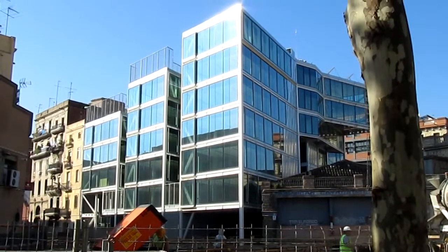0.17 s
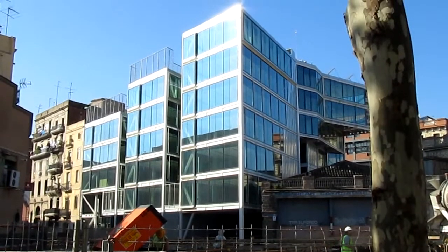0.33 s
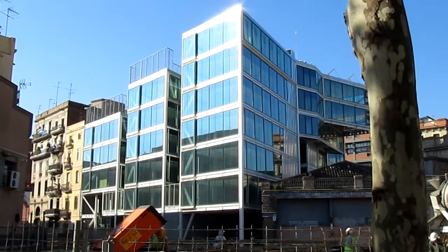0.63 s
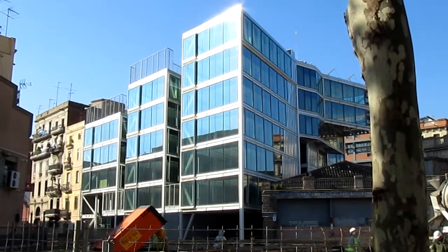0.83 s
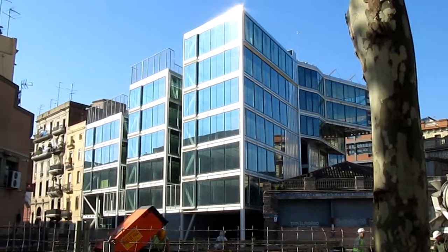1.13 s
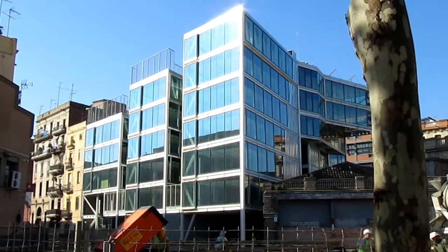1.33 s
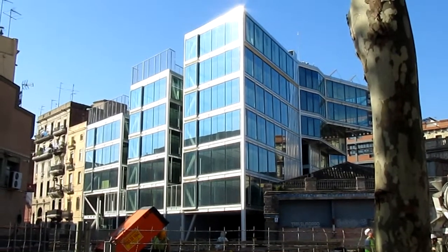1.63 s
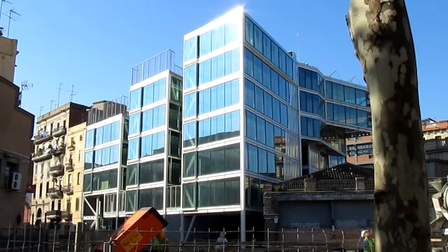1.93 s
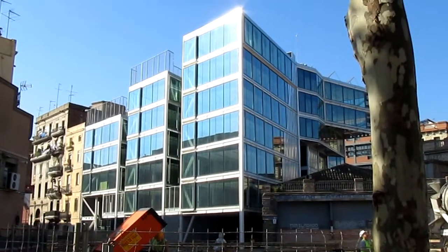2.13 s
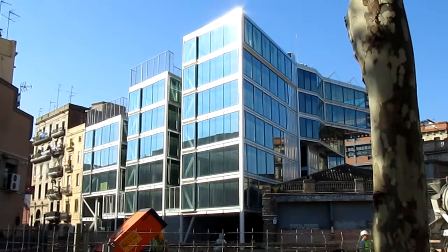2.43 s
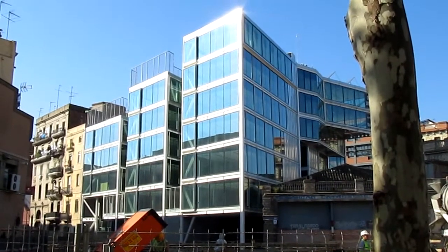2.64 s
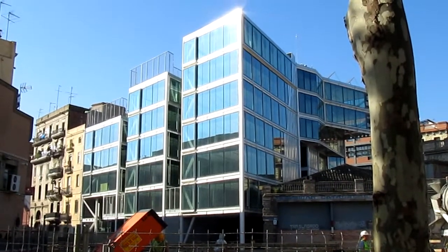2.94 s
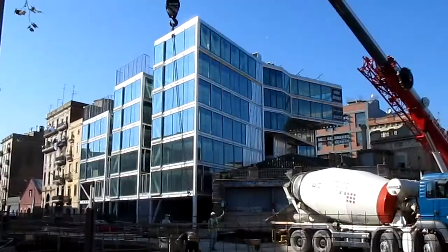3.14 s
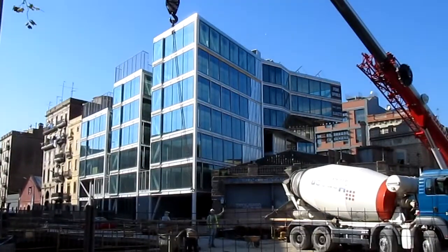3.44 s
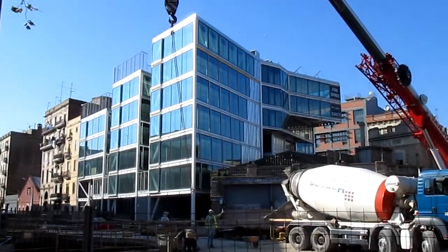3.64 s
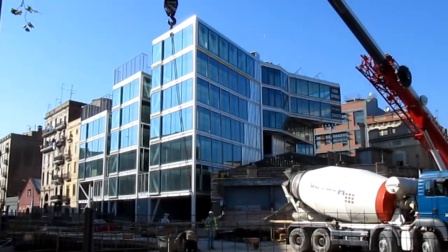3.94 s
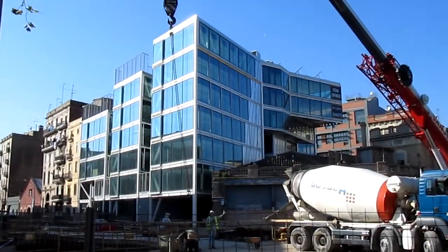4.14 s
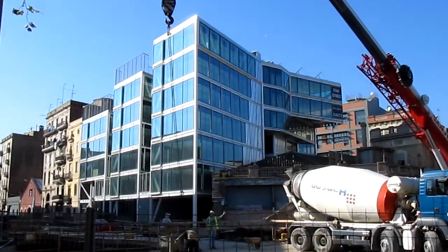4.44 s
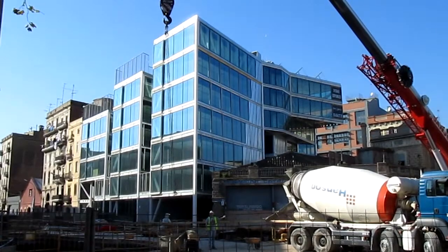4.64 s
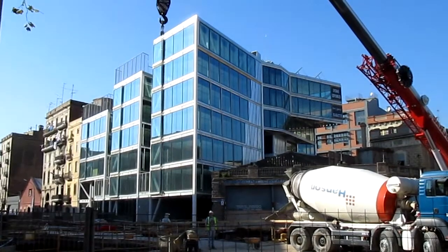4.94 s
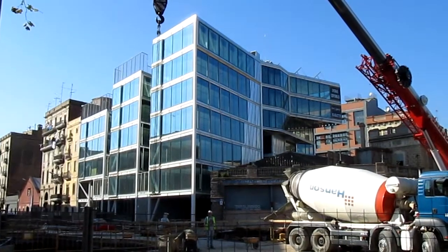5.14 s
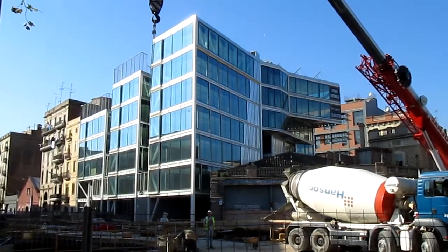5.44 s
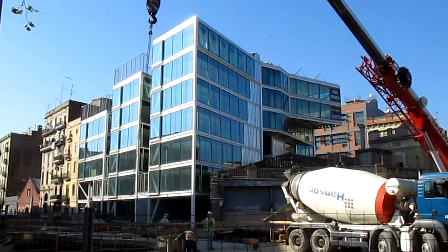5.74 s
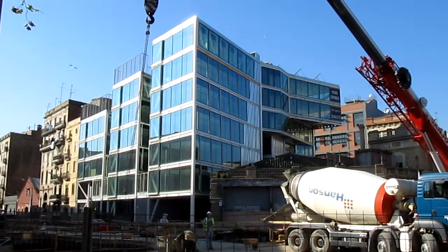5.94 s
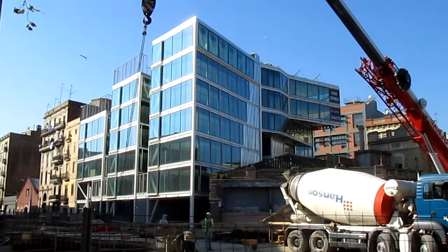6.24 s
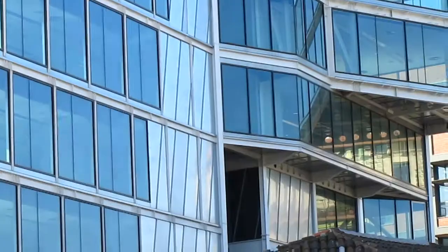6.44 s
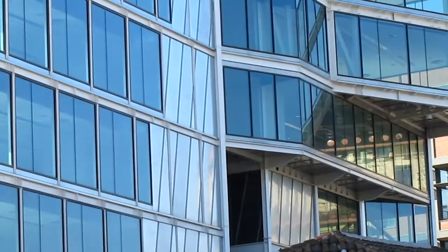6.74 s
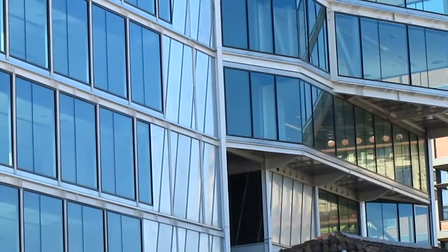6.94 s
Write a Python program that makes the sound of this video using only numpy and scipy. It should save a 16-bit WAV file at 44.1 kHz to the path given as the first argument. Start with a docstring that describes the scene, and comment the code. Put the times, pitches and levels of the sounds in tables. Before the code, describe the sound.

Low engine rumble and a wavering mixer truck drone lie under six irregular, heavy steel hammer blows, the first bright and loud, the third weaker. Each rings for about half a second and washes off surrounding buildings. The recorder's automatic gain dips at loud hits. Two very brief silences split the stereo recording into three parts; the last has no blows, just strong engine drone, a steady high squeal and tiny metallic clinks.

```python
"""Six heavy hammer blows on steel formwork: a crack, a bang and ringing panel modes, with facade echoes and wash.
Diesel machinery rumbles nearby and a mixer truck drones: banded noise plus wavering sine tones.
Metal clinks are short noise bursts; thin squeals are sines, one nearly steady and others gliding.
The recorder's gain ducks at each loud blow and creeps back. The sound cuts out twice, briefly;
after the second break the engines are much louder, with a thin squeal and small clinks."""
import sys
import numpy as np
from scipy import signal
from scipy.io import wavfile
from scipy.ndimage import uniform_filter1d

SR = 44100
rng = np.random.default_rng(int(sys.argv[2]) if len(sys.argv) > 2 else 0)


def master_out(mix):
    """Clip the mix to full scale and print it as 16-bit PCM to the path in sys.argv[1]."""
    frames = np.transpose(np.atleast_2d(mix))
    ceiling = np.clip(frames, -1, 1)
    pcm = np.round(ceiling * 32767).astype(np.int16)
    wavfile.write(sys.argv[1], SR, pcm)


N = 312669
TIME = np.arange(N) / SR
AGE = np.arange(2 * SR) / SR

# hammer blows: (time [s], panel [index], relative level [dB], bass [dB], treble [dB], first impact [dB],
# build-up [s], ring t60 [s], facade wash [dB], facade echo delay [s], facade echo level [dB])
BLOWS = [(0.5985, 0, 2, -5, 5.5, -3.5, 0.009, 0.43, -12.5, 0.34, -26),
         (2.3872, 0, -7, 5, -4, -9, 0.0041, 0.65, -13, 0.22, -17.5),
         (3.1680, 1, -15, -1.5, 1, -11, 0.0049, 0.38, -7.5, 0.13, -9.5),
         (3.838, 1, -8, -4.5, 3, 4, 0.0013, 0.32, -14, 0.18, -19.5),
         (4.9953, 1, -2.5, 1, -1, 0, 0.0035, 0.46, -12.5, 0.175, -20),
         (5.835, 1, 0, 0, 0, -4, 0.0018, 0.41, -12, 0.29, -20.5)]
# crowded panel modes, bass to treble, one list per panel: (frequency [Hz], relative density [dB per Hz])
PANEL_COLOUR = [
    [(25, -63), (65, -41), (120, -21.5), (165, -10), (220, -7), (330, 1.5), (420, -5), (850, 0.5),
     (1250, -2), (2000, -6), (3000, -9.5), (4000, -17.5), (6000, -15.5), (9000, -25.5), (15000, -51)],
    [(25, -51), (65, -38), (120, -15), (165, -16), (230, -9), (400, -7.5), (680, -1.5), (1050, -7),
     (1700, -11.5), (3350, -14.5), (4100, -21), (5200, -17.5), (7200, -25.5), (10000, -35), (15000, -56)],
]
# strong modes, one list per panel: (frequency [Hz], relative level [dB], t60 [s])
PANEL_MODES = [
    [(209.6, -15.5, 0.59), (224, -18.5, 0.74), (305, -12.5, 0.93), (342.4, -7, 0.83), (344.6, -11, 0.97),
     (510, -11.5, 0.85), (580.6, -17, 1.66), (734, -23, 0.75), (811, -10.5, 0.32), (884, -10.5, 0.67),
     (1095, -21.5, 0.4), (1177, -16.5, .6), (1305, -16.5, 0.72), (1726, -14.5, 0.36), (2440, -19.5, .4),
     (2680, -19, 0.44), (3140, -28, 0.3)],
    [(119, -17.5, 0.25), (204, -16.5, 0.94), (232, -12.5, 0.4), (294, -16.5, 0.9), (323.6, -12.5, 0.64),
     (382, -23, 1), (448, -14.5, 1), (534, -15.5, 0.24), (583, -18.5, 0.9), (666, -2.5, 0.29),
     (678.6, -11, .6), (775, -26, 0.17), (884, -17.5, 1), (1016, -11, 0.3), (1148, -17.5, 0.81),
     (1343, -20.5, 0.21), (1784, -19.5, 0.49), (2080, -25, .35), (2870, -29.5, 0.44), (3166, -11.5, 0.17),
     (3450, -13.5, 0.17), (7150, -24.5, 0.27)],
]
# ring time against the blow's own: (frequency [Hz], ratio [1])
RING_SHARE = [(100, .9), (250, 1.54), (700, 1.15), (2000, 1.06), (5000, 0.72), (12000, 0.675)]
# reverberation between the facades: (frequency [Hz], t60 [s])
SITE_T60_S = [(100, 0.47), (300, 2.32), (800, 1.7), (2500, 1.38), (5000, 1.13), (12000, 0.26)]
# single returns from near walls: (delay [s], level [dB])
WALL_ECHOES = [(.022, -14.5), (.046, -11.5), (.09, -17)]
# small metal clinks: (time [s], level [dB], centre [Hz], t60 [s])
CLINKS = [(0.406, -31.5, 1190, 0.44), (0.970, -38.5, 6550, 0.086), (1.021, -34.5, 7500, 0.067),
          (1.129, -32.5, 6450, 0.43), (3.295, -38.5, 5200, 0.22), (5.309, -46, 8600, .03),
          (6.67, -19.5, 4800, 0.017), (6.679, -28.5, 5300, 0.096), (6.736, -24, 4650, 0.048),
          (6.748, -27, 4700, 0.13)]
# stretches of sound between the silences: (start [s], end [s])
STRETCHES = [(-1, 3.033), (3.166, 6.370), (6.505, 8)]
# machinery noise, one list per stretch: (frequency [Hz], relative density [dB per Hz])
ROAR_SPECTRA = [
    [(25, -19.5), (48, -17), (64, -11), (115, 3.5), (185, -8.5), (240, -1), (420, -11), (750, -9),
     (1300, -12.5), (2800, -19.5), (4000, -26), (6500, -29.5), (10000, -39), (15000, -53)],
    [(25, -17.5), (48, -14), (70, -15.5), (115, 0), (170, -7.5), (225, -4), (290, -11), (800, -8),
     (1300, -13), (2900, -20.5), (4000, -24.5), (6800, -30.5), (10000, -40.5), (15000, -59.5)],
    [(25, -9), (45, -15), (65, -0.5), (100, 2.5), (220, -1), (400, -3.5), (650, -4.5), (1200, -8),
     (1800, -14.5), (2500, -15.5), (4000, -22), (5500, -23.5), (7700, -31.5), (10000, -37), (15000, -57)],
]
# machinery noise before the load curve, one per stretch: level [dB]
ROAR_DB = [-28, -36, -25]
# engine tones before the load curve, one list per stretch: (frequency [Hz], level [dB rms])
HUMS = [
    [(65, -46), (110, -44.5), (132, -41)],
    [(113, -51.5), (221, -45)],
    [(64.6, -42), (113, -38.5), (161.5, -40), (220.7, -31), (290.7, -38.5), (436, -44), (570.6, -42)],
]
# left-right correlation of the blows: (frequency [Hz], correlation [1])
BLOW_LIKENESS = [(100, 0.84), (1000, .98), (2800, 0.91), (5500, 0.59), (9000, 0.32), (14000, 0.38)]
# left-right correlation of the machinery noise: (frequency [Hz], correlation [1])
ROAR_LIKENESS = [(30, 0.85), (100, 0.92), (400, 0.96), (1300, 0.95), (2800, 0.84), (5500, 0.75),
                 (9000, 0.099), (14000, 0.12)]
# microphone resonances and dips: (frequency [Hz], width [Hz], gain [dB])
MIC_COLOUR = [(3934, 1100, -7), (6850, 400, 1.5), (11300, 4400, -6.5)]
# machinery balance: (frequency [Hz], left over right [dB])
MACHINE_SIDE = [(50, -3.4), (130, -2.7), (450, -2.1), (1300, -1.2), (8000, -.8)]
# engine load: (time [s], rumble level [dB])
LOAD = [(0, -20.5), (0.45, -10), (2.0, -1.5), (3.0, 0), (4.8, 2), (5.5, 1), (6.3, 2), (6.55, 0.5),
        (7.09, -2.5)]
# how far the noise follows the load: (frequency [Hz], share of the dB swing [1])
LOAD_SHARE = [(280, 1.0), (750, 0.45), (2500, 0.03)]
# machine squeals: (start [s], length [s], first pitch [Hz], last pitch [Hz], level [dB rms], pitch wander [ratio])
SQUEALS = [(1.648, 0.12, 7270, 7120, -53, 0.008), (6.51, 0.48, 2318, 2320, -41.5, 0.00055),
           (6.507, 0.16, 7030, 7200, -56, 0.008), (6.853, 0.3, 7800, 8300, -55, 0.01)]

# filter bank, bands about a third of an octave wide
EDGES_HZ = np.geomspace(22, 17000, 28)
CENTRES_HZ = np.sqrt(EDGES_HZ[1:] * EDGES_HZ[:-1])
BANK = [signal.butter(2, edge, "band", fs=SR, output="sos") for edge in zip(EDGES_HZ, EDGES_HZ[1:])]

# where and how squarely the head lands tips bass and treble about a fixed middle
BASS_HZ, MIDDLE_HZ, TREBLE_HZ = 300, 750, 2500
MODES_DB, CRACK_DB = 0.5, -4   # modes offset; crack against first impact
SQUEAL_ATTACK_S, SQUEAL_RELEASE_S = 0.013, 0.08
LIMIT_DB, DETECT_S, AHEAD_S, RECOVER_DB_PER_S = -11, 0.0083, 0.0063, 3   # recorder gain control
CUTOFF_HZ = 15400


def from_db(db):
    """Decibels to amplitude gain."""
    return 10 ** (np.asarray(db) / 20)


def rms_one(x):
    """Scale to rms 1."""
    return x / np.sqrt(np.mean(x ** 2) + 1e-20)


def at_hz(points, hz):
    """Read a (frequency [Hz], value) table on a log-frequency axis."""
    table = np.array(points)
    return np.interp(np.log(hz), np.log(table[:, 0]), table[:, 1])


def fade(t60_s):
    """Free decay: 60 dB down after t60_s."""
    return np.exp(-np.log(1000) * AGE / t60_s)


def swell(rise_s):
    """Exponential rise from zero to one."""
    return 1 - np.exp(-AGE / max(rise_s, 1e-4))


def add(out, start_s, sound):
    """Mix a sound in from start_s."""
    at = round(start_s * SR)
    out[:, at:at + sound.shape[-1]] += sound[..., :N - at]


def drift(rate_hz):
    """Random curve: straight lines between normal draws of spread 1, rate_hz per second."""
    knots = rng.standard_normal(int(rate_hz * N / SR) + 2)
    return np.interp(TIME * rate_hz, np.arange(len(knots)), knots)


def pan(left_db):
    """Channel gains for a source louder on the left by left_db."""
    return from_db(np.array([[left_db], [-left_db]]) / 2)


def gate(start_s, end_s):
    """Open for one stretch, with 2 ms fades."""
    return np.clip(np.minimum(TIME - start_s, end_s - TIME) / 0.002, 0, 1)


def noise_bands(spectrum, likeness, size):
    """Stereo noise split into bands that sum to rms 1: (band, channel, sample)."""
    white = rng.standard_normal((2, 2, size + SR // 5))
    bands = []
    for k, (hz, sos) in enumerate(zip(CENTRES_HZ, BANK)):
        # neighbouring bands use different noise; the filter start-up is dropped
        mid, side = signal.sosfilt(sos, white[k % 2])[:, -size:]
        alike = np.clip(at_hz(likeness, hz), 0, 1)
        stereo = np.sqrt(1 + alike) * mid + np.sqrt(1 - alike) * side * [[1], [-1]]
        bands.append(from_db(at_hz(spectrum, hz)) * stereo)
    return np.array(bands) / np.std(sum(bands))


def burst(hz, t60_s, spread=1.5, side_share=0.28):
    """Crowded ringing around one pitch: decaying band noise."""
    edges_hz = [hz / max(spread, 1.1), min(hz * spread, SR / 2 - 100)]
    sos = signal.butter(2, edges_hz, "band", fs=SR, output="sos")
    mid, side = signal.sosfilt(sos, rng.standard_normal((2, len(AGE))))
    return rms_one(mid + side_share * side * [[1], [-1]]) * fade(t60_s)


def machinery(flutter_db=1.3, waver_db=4.0, wander=0.0058):
    """Engine roar, fluttering band by band, under engine tones wavering in pitch and level."""
    load_s, load_db = np.transpose(LOAD)
    rumble_db = np.interp(TIME, load_s, load_db)
    gains = []
    for hz in CENTRES_HZ:
        band_db = at_hz(LOAD_SHARE, hz) * rumble_db + flutter_db * drift(18)
        gains.append(from_db(band_db) * pan(at_hz(MACHINE_SIDE, hz)))
    out = np.zeros((2, N))
    for stretch, spectrum, level_db, hums in zip(STRETCHES, ROAR_SPECTRA, ROAR_DB, HUMS):
        on = np.flatnonzero(gate(*stretch))
        bands = noise_bands(spectrum, ROAR_LIKENESS, len(on))
        out[:, on] += from_db(level_db) * sum(band * gain[:, on] for band, gain in zip(bands, gains))
        for hz, hum_db in hums:
            phase = 2 * np.pi * np.cumsum(hz * (1 + wander * drift(12)[on])) / SR
            size = np.sqrt(2) * from_db(hum_db + rumble_db + waver_db * drift(14))[on]
            out[:, on] += size * np.sin(phase) * pan(at_hz(MACHINE_SIDE, hz))
    return out


def squeals(waver_db=1):
    """Thin unsteady sine squeals, one nearly steady in pitch and others gliding, each swelling and dying away."""
    out = np.zeros(N)
    for start_s, length_s, first_hz, last_hz, level_db, wander in SQUEALS:
        end_s = start_s + length_s
        path_hz = np.interp(TIME, [start_s, end_s], [first_hz, last_hz])
        hz = path_hz * (1 + wander * drift(200))
        rise = (TIME - start_s) / SQUEAL_ATTACK_S
        fall = (end_s - TIME) / SQUEAL_RELEASE_S
        envelope = np.clip(np.minimum(rise, fall), 0, 1)
        size = np.sqrt(2) * envelope * from_db(level_db + waver_db * drift(40))
        out += size * np.sin(2 * np.pi * np.cumsum(hz) / SR)
    return out


def clinks():
    """Small pieces of metal knock together: short ringing bursts."""
    out = np.zeros((2, N))
    for start_s, level_db, hz, t60_s in CLINKS:
        add(out, start_s, from_db(level_db) * burst(hz, t60_s, spread=1.39, side_share=0.28))
    return out


def blow(panel, contact, impact_db, build_s, t60_s, wash_db,
         impact_t60_s=0.021, twin_share=0.64, twin_split=0.013):
    """A crack of steel on steel, the panel's first bang and ring, and the wash from the facades."""
    def spreading(hz):
        """Low bending waves travel slowly and build up late."""
        return swell(build_s + 4.1 / hz)

    ring, wash = 0, 0
    for hz, band in zip(CENTRES_HZ, noise_bands(PANEL_COLOUR[panel], BLOW_LIKENESS, len(AGE))):
        band = band * from_db(at_hz(contact, hz))
        impact = from_db(impact_db) * swell(0.73 / hz) * fade(impact_t60_s)
        sustain = from_db(-1.5) * spreading(hz) * fade(t60_s * at_hz(RING_SHARE, hz))
        ring = ring + band * (impact + sustain)
        # the wash reuses the band noise, time-reversed
        wash = wash + band[:, ::-1] * swell(0.17) * fade(at_hz(SITE_T60_S, hz))
    for hz, mode_db, mode_t60_s in PANEL_MODES[panel]:
        detune = 1 + 0.0028 * rng.standard_normal()
        phase = 2 * np.pi * (hz * AGE * detune + rng.random())
        twin_phase = phase * (1 + twin_split * rng.standard_normal())
        pair = np.sin(phase) + twin_share * np.sin(twin_phase)   # close modes beat
        gain = from_db(MODES_DB + mode_db + at_hz(contact, hz)) / np.hypot(1, twin_share)
        ring = ring + gain * pair * spreading(2 * hz) * fade(mode_t60_s)
    crack = from_db(impact_db + CRACK_DB) * burst(4000, t60_s=0.021, spread=1.2)
    return ring + from_db(wash_db) * wash + crack


def hammer():
    """All blows, each with a dull facade echo, plus early returns from the nearest walls."""
    out = np.zeros((2, N))
    facade = signal.butter(2, 2800, fs=SR, output="sos")
    wall = signal.butter(1, 6000, fs=SR, output="sos")
    for start_s, panel, level_db, bass_db, treble_db, *stroke, echo_s, echo_db in BLOWS:
        contact = [(BASS_HZ, bass_db), (MIDDLE_HZ, 0), (TREBLE_HZ, treble_db)]
        sound = from_db(level_db) * blow(int(round(panel)), contact, *stroke)
        add(out, start_s, sound)
        add(out, start_s + echo_s, from_db(echo_db) * signal.sosfilt(facade, sound))
    dull = signal.sosfilt(wall, out)   # walls take off some treble
    for delay_s, echo_db in WALL_ECHOES:
        add(out, delay_s, from_db(echo_db) * dull)
    return out


def scene():
    """Blows, clinks and squeals nearly ahead, machinery a little to the right."""
    return (hammer() + clinks() + squeals()) * pan(left_db=-1.2) + machinery()


def gain_control(x):
    """Power over the limit pulls the gain down, slightly ahead; it recovers at a steady dB rate."""
    power = uniform_filter1d(np.mean(x ** 2, axis=0), max(int(DETECT_S * SR), 1))
    excess_db = np.maximum(10 * np.log10(np.maximum(power, 1e-12)) - LIMIT_DB, 0)
    recovery_db = RECOVER_DB_PER_S * TIME
    cut_db = np.maximum.accumulate(excess_db + recovery_db) - recovery_db
    return x * from_db(-np.interp(TIME + AHEAD_S, TIME, cut_db))


def record(dry, rolloff_hz=11500):
    """Microphone colour, gain control restarted per stretch, silence between, rounded peaks, treble cut."""
    for hz, width_hz, peak_db in MIC_COLOUR:
        resonance = signal.lfilter(*signal.iirpeak(hz, hz / width_hz, fs=SR), dry)
        dry = dry + (from_db(peak_db) - 1) * resonance
    levelled = sum(gain_control(dry * gate(*stretch)) for stretch in STRETCHES)
    ceiling = 1.1
    rounded = ceiling * np.tanh(levelled / ceiling)
    heard = signal.sosfilt(signal.butter(2, rolloff_hz, fs=SR, output="sos"), rounded)
    return signal.sosfilt(signal.ellip(10, 0.1, 80, CUTOFF_HZ, fs=SR, output="sos"), heard)


dry = scene()
out = record(dry)
master_out(out)
```